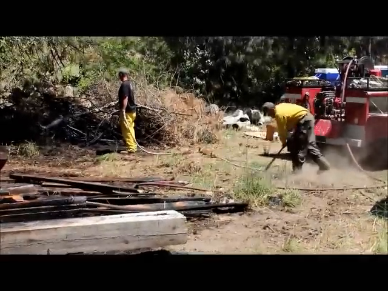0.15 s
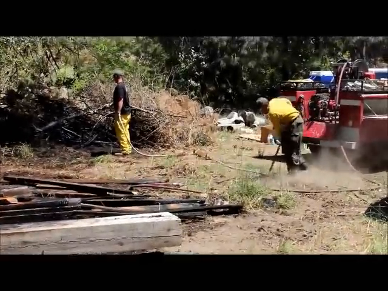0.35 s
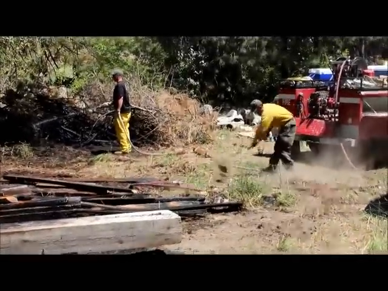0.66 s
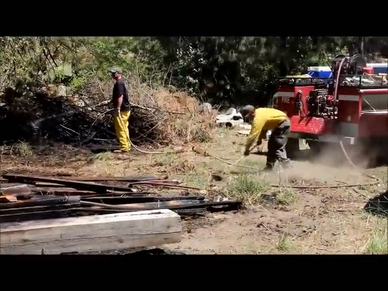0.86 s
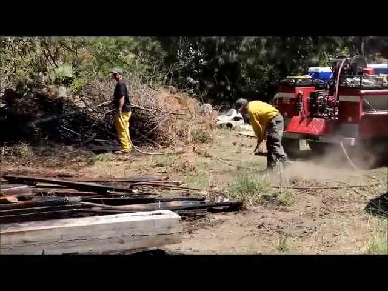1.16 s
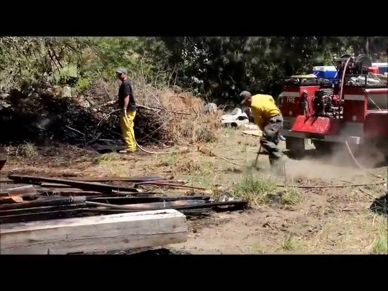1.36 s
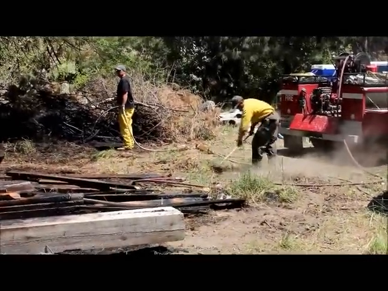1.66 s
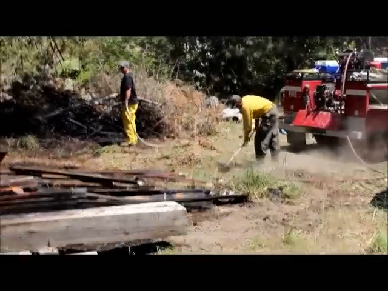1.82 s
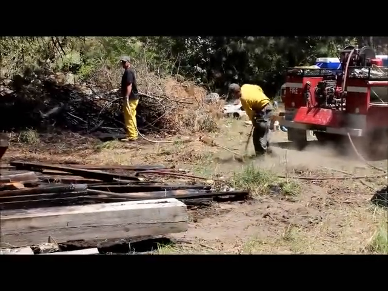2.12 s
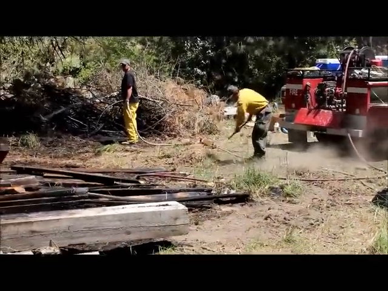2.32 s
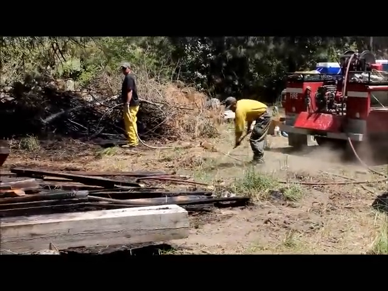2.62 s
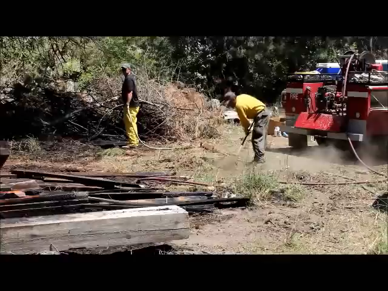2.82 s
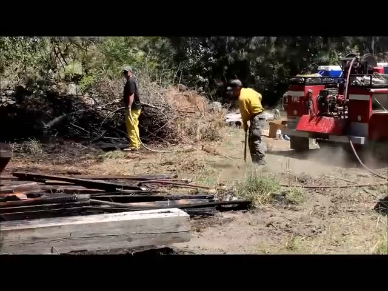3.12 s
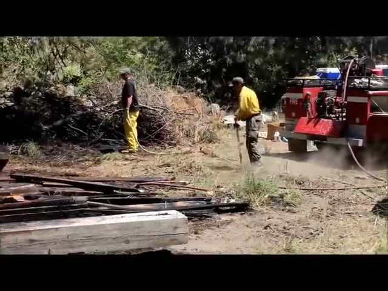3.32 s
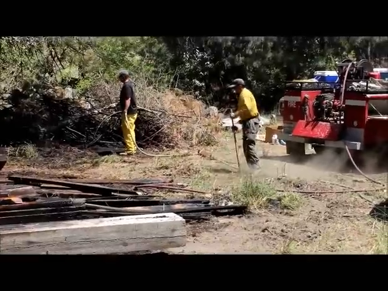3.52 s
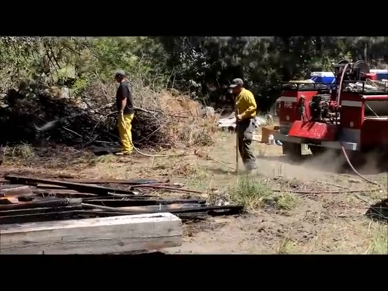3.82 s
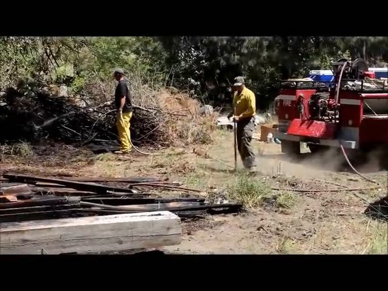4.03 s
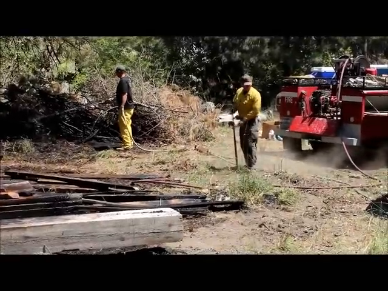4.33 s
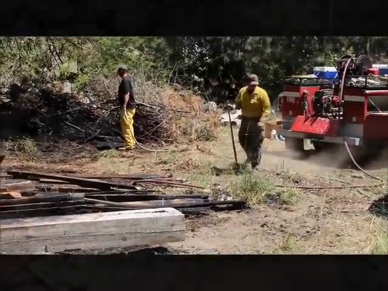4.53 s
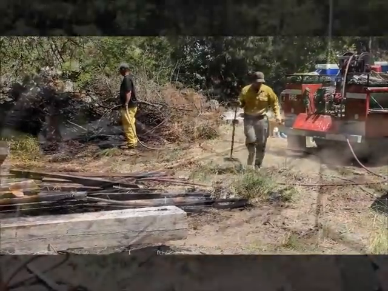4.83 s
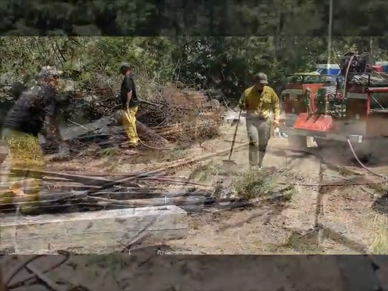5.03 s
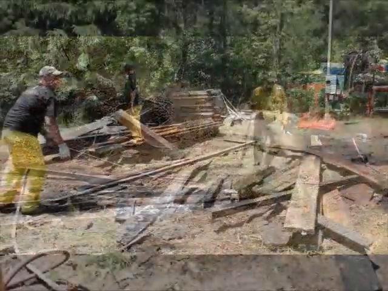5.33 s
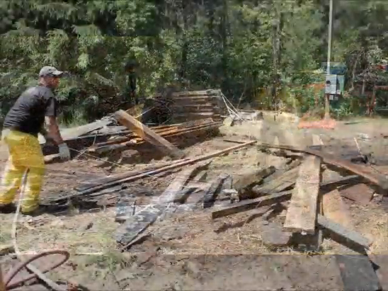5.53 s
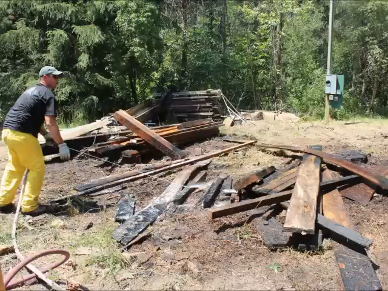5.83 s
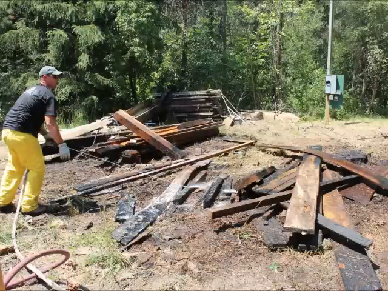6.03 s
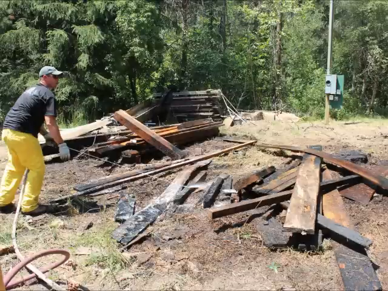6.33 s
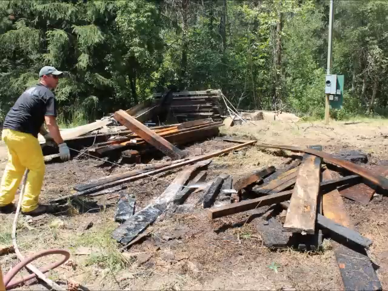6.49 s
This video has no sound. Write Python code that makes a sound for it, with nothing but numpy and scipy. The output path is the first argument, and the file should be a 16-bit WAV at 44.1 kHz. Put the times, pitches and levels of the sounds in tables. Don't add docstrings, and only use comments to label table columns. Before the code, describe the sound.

A steady, harsh, fast-puttering fire truck pump motor roars over a low idle, metal tool clinking twice on stones, until the sound cuts dead.

```python
import sys
import numpy as np
from scipy import signal
from scipy.io import wavfile
from scipy.ndimage import uniform_filter1d

SR = 44100
rng = np.random.default_rng(int(sys.argv[2]) if len(sys.argv) > 2 else 0)


def amplitude_ratio(level_db):
    exponent = np.asarray(level_db, float) / 20
    return 10 ** exponent


def dump(signal):
    limited = np.clip(np.atleast_2d(signal).T, -1, 1)
    pcm = np.round(limited * 32767).astype(np.int16)
    wavfile.write(sys.argv[1], SR, pcm)


N = 293706

# time in seconds, firings per second.
PUMP_SPEED = [(0, 27.402), (.75, 27.371), (1.5, 27.336), (2.25, 27.325), (3, 27.366), (3.75, 27.325),
              (4.5, 27.335), (5.25, 27.275), (6, 27.345)]
# time in seconds, firings per second.
MATE_SPEED = [(0, 28.879), (1, 29.002), (2, 28.973), (3, 28.987), (4, 28.866), (5, 28.751), (6, 28.847)]
# multiple of the firing rate, level in dB rms.
EXHAUST = [(1, -55), (2, -34), (3, -43), (4, -39), (5, -30), (6, -32), (7, -32), (8, -46), (9, -35),
           (10, -37), (11, -44), (12, -56), (13, -42), (14, -42), (15, -44), (16, -53), (17, -49),
           (18, -41), (19, -43), (20, -48)]
# multiple of the firing rate, level in dB rms.
SHROUD = [(21, -46), (22, -44), (24, -33), (25, -43), (26, -36), (27, -37), (28, -34), (29, -35), (30, -30),
          (31, -35), (32, -28), (33, -39), (36, -46), (40, -48), (42, -38), (44, -41), (46, -48), (48, -44),
          (49, -47), (50, -43), (56, -41), (60, -43), (61, -43), (62, -45), (70, -45), (73, -48), (78, -42),
          (84, -47)]
# multiple of the firing rate, level in dB rms.
MATE_EXHAUST = [(1, -50), (2, -49), (3, -37), (4, -37), (5, -42), (7, -33), (8, -42), (10, -38), (11, -47),
                (19, -45), (22, -46)]
# multiple of its cycle rate, level in dB rms.
IDLE = [(6, -56), (12, -37.5), (13, -49), (26, -51.5), (35, -42), (36, -44.5)]
# frequency in Hz, level in dB rms.
BELTS = [(66.9, -45.5), (70.2, -57), (102.9, -48), (123.0, -42), (133.6, -47.5), (157.6, -53.5),
         (168.1, -46.5), (212.3, -47.5), (224.9, -46)]

# frequency in Hz, level in dB per Hz.
ROAR = [(18, -25.5), (35, -30), (60, -22.5), (110, -9.5), (200, -3.5), (310, -4.5), (420, -7.5), (500, -15),
        (600, -4.5), (720, 0.5), (870, -1.5), (1000, -4.5), (1150, -18.5), (1400, -42.5)]
BODY = [(800, -40), (1000, -6), (1250, -3.5), (1650, -2.5), (2200, -3), (2700, -9), (3300, -41.5)]
CLATTER = [(1900, -28), (2500, -5), (3000, -1.5), (4000, -3), (4900, -6), (5500, -11.5), (7000, -38)]
HISS = [(4000, -38), (5000, -3), (5800, -2), (7000, -5), (9000, -7), (10500, -8.5), (11500, -13),
        (14000, -42.5)]
LEAK = [(7500, -29.5), (10000, -13), (11800, -1.5), (13000, 2.5), (14600, -0.5), (15650, -1.5),
        (16500, -38)]
# frequency in Hz, width in Hz, lift in dB.
PANELS = [(1620, 280, 1.5), (2195, 120, 0), (2915, 85, 6.5), (3100, 180, -2), (3480, 180, 5),
          (3950, 130, 6), (4340, 180, -0.5), (4576, 120, 8.5), (4640, 130, -3), (4820, 120, 0.5),
          (5860, 200, 4), (6100, 140, 0.5), (6300, 220, -1), (6800, 300, 1)]

# start as share of the cycle, length in cycles, level in dB,
# growth over the stroke in dB.
BLOWDOWN = [(.42, .26, 0, 1.8)]
VALVES = [(.04, 0.3, -5.5, 6), (.4, 0.33, 0.5, 0.5)]
JETS = [(.03, 0.29, 0.92, -1), (.41, .26, -1, 0)]
LEAKS = [(.03, 0.3, 2.5, -13), (.41, 0.39, -2, -2.5)]

# share of the cycle, level in dB.
KNOCKS = [(.46, -23), (.61, -20), (.965, -21.5)]
# frequency in Hz, level in dB, 60 dB decay in seconds.
KNOCK_RING = [(1690, 0, .006), (3880, -4, 0.0048)]
# time in seconds, peak in dB, 60 dB decay in seconds.
SPADE = [
    (1.063, -14.5, 0.035),
    (2.7914, -20.5, 0.025),
]
# frequency in Hz, level in dB.
BLADE = [(2500, 3.5), (4000, -3.5), (5750, -0.5), (6600, -3.5), (6950, -3.5), (8200, -13.5), (10100, -17.5)]

# time in seconds, level in dB.
BREEZE = [(0, -32), (.7, -31.5), (1.15, -32.5), (1.75, -33), (2.4, -32.5), (3.35, -32.5), (3.6, -33),
          (4.3, -34), (4.75, -33.5), (5.05, -32.5), (5.45, -34.5), (5.95, -33)]
# time in seconds, depth in dB.
DUCKS = [(.6, 2), (.85, 4), (1.72, 4), (2.106, 3.5), (2.442, 4), (3.48, 5), (3.53, 2.5), (4.315, 2),
         (4.74, 4), (5.361, 3), (5.56, 2)]

IDLE_HZ, CUT_S = 7.137, 5.98195
CLATTER_FOLLOWS, HISS_FOLLOWS, LEAK_FOLLOWS, WHOLE_FOLLOWS = 1, 2.4, .4, 0.24
PRIME_DB, PRIME_S, PRIME_SPREAD_S = 2, 1, .25
KNOCK_SPREAD, KNOCK_SCATTER_DB = .02, 3.5
DUCK_ATTACK_S, DUCK_RECOVERY_S = 0.0085, .045


def unit(x):
    return x / np.sqrt(np.mean(x ** 2) + 1e-20)


def curve(rows):
    s, value = np.transpose(rows)
    return np.interp(np.arange(N) / SR, s, value)


def wobble(rate):
    knots = rng.standard_normal(int(N * rate / SR) + 4)
    return np.interp(np.arange(N) * rate / SR, np.arange(len(knots)), knots)


def breeze_db():
    db = curve(BREEZE)
    return db - db.mean()


def partials(cycle, orders, lag, unsteady_db, drift):
    out = np.zeros(N)
    for (k, db), turns in zip(orders, lag):
        wander = amplitude_ratio(unsteady_db * wobble(9))
        phase = k * cycle + turns + drift * (1 + k / 40) * wobble(7)
        out += amplitude_ratio(db) * unit(wander) * np.cos(2 * np.pi * phase)
    return np.sqrt(2) * out


def bursts(cycle, strokes, force, steady, scatter_db, rise, fall):
    gate = np.zeros(N)
    for (start, length, db, growth_db), shared in zip(strokes, force):
        turn, since = np.divmod(cycle - start + 1, 1)
        own = rng.standard_normal(len(shared))
        chance = np.clip(.8 * shared + .6 * own, -3, 1.6)
        closing = 1 + np.exp(np.minimum((since - length) / fall, 50))
        opening = (1 - np.exp(-since / rise)) / closing
        stroke_db = db + scatter_db * chance[turn.astype(int)] + growth_db * since / length
        gate += amplitude_ratio(stroke_db) * opening
    rattle = np.repeat(rng.standard_normal(N // 16 + 1), 16)[:N]
    return steady + gate * amplitude_ratio(1.6 * rattle)


def rush(spectrum, patchy_db, gate):
    hz, _, z = signal.stft(gate * rng.standard_normal(N), SR, nperseg=2048)
    patches = uniform_filter1d(rng.standard_normal(z.shape), size=14, axis=0)
    patches = uniform_filter1d(patches, size=2, axis=1)
    f, level = np.transpose(spectrum)
    colour_db = np.interp(np.log(hz + 1), np.log(f), level, left=-120, right=-120)
    for centre, width, lift in PANELS:
        colour_db += lift / (1 + (2 * (hz - centre) / width) ** 2)
    z = z * amplitude_ratio(colour_db[:, None] + patchy_db * unit(patches))
    return unit(signal.istft(z, SR, nperseg=2048)[1][:N])


def exhaust_puffs(cycle):
    k = np.transpose(EXHAUST)[0]
    lag = .37 - .5 * k + .45 * (k > 8)
    lag += .07 * np.maximum(k - 11, 0) ** 2
    return amplitude_ratio(0.1) * partials(cycle, EXHAUST, lag, unsteady_db=0.6, drift=0.012)


def shroud_and_gas(cycle):
    t = np.arange(N) / SR
    shroud_db = 0.23 - PRIME_DB / (1 + np.exp((t - PRIME_S) / PRIME_SPREAD_S))
    lift_db = breeze_db()
    ring = partials(cycle, SHROUD, rng.random(len(SHROUD)), unsteady_db=1.5, drift=.045)
    force = rng.standard_normal((2, 200))

    gate = bursts(cycle, BLOWDOWN, force[1:], steady=16.0, scatter_db=0.0, rise=.04, fall=0.018)
    roar = rush(ROAR, 1.83, gate)
    gate = bursts(cycle, BLOWDOWN, force[1:], steady=4.0, scatter_db=1.5, rise=0.072, fall=0.011)
    body = rush(BODY, 0.4, gate)
    steady = 1.33 * amplitude_ratio(-.4 * lift_db)
    gate = bursts(cycle, VALVES, force, steady, scatter_db=2.5, rise=0.045, fall=0.018)
    clatter = rush(CLATTER, 0.67, gate)
    steady = 1.33 * amplitude_ratio(-1.3 * lift_db)
    gate = bursts(cycle, JETS, force, steady, scatter_db=2.0, rise=.008, fall=0.041)
    hiss = rush(HISS, 1.3, gate)
    gate = bursts(cycle, LEAKS, force, steady=1.6, scatter_db=2.0, rise=.015, fall=.04)
    leak = rush(LEAK, 0.6, gate)

    out = amplitude_ratio(shroud_db) * (amplitude_ratio(0.55) * ring + amplitude_ratio(-21.5) * roar)
    out += amplitude_ratio(-23.5) * body
    out += amplitude_ratio(-26.0 + CLATTER_FOLLOWS * lift_db) * clatter
    out += amplitude_ratio(-33.5 + HISS_FOLLOWS * lift_db) * hiss
    out += amplitude_ratio(-44.5 + LEAK_FOLLOWS * lift_db) * leak
    return out


def knocks(cycle):
    share, knock_db = np.transpose(KNOCKS)
    late, hard, side = rng.random((3, 200, len(KNOCKS)))
    due = np.arange(len(late))[:, None] + share + KNOCK_SPREAD * (2 * late - 1)
    at = np.searchsorted(cycle, due)
    size = amplitude_ratio(knock_db - KNOCK_SCATTER_DB * np.log(.03 + hard)) * np.sign(side - .5)
    t = np.arange(SR // 100) / SR
    ring = sum(amplitude_ratio(db - 60 * t / t60) * np.sin(2 * np.pi * hz * t) for hz, db, t60 in KNOCK_RING)
    hits = np.bincount(at.ravel(), size.ravel(), N + 1)
    return signal.fftconvolve(hits, ring)[:N]


def pump_engine():
    cycle = np.cumsum(curve(PUMP_SPEED)) / SR
    return exhaust_puffs(cycle) + shroud_and_gas(cycle) + knocks(cycle)


def mate_engine():
    cycle = np.cumsum(curve(MATE_SPEED)) / SR
    lag = .24 * np.transpose(MATE_EXHAUST)[0] - .25
    return partials(cycle, MATE_EXHAUST, lag, unsteady_db=2.0, drift=0.024)


def truck_idle():
    t = np.arange(N) / SR
    cycle = IDLE_HZ * t + .447
    engine = partials(cycle, IDLE, np.full(len(IDLE), .46), unsteady_db=.9, drift=.02)
    belts = partials(t, BELTS, rng.random(len(BELTS)), unsteady_db=-3.0, drift=0.008)
    return engine + belts


def spade():
    out, t = np.zeros(N), np.arange(SR // 10) / SR
    for s, db, t60 in SPADE:
        ring = sum(amplitude_ratio(level + rng.normal(0, 2)) * np.sin(2 * np.pi * hz * t) for hz, level in BLADE)
        grit = rng.standard_normal(len(t))
        ring += .6 * np.convolve(grit, [.5, 1, 1.0, 0, -.7, -1, -0.18], 'same')
        envelope = amplitude_ratio(db - 5.5 - 60 * t / max(t60, .01)) * (1 - np.exp(-t / 0.0009))
        out[round(s * SR):][:len(t)] += envelope * ring
    return out


def scene():
    return (pump_engine() + mate_engine() + truck_idle() + spade())[None]


def top_cut(x):
    return signal.sosfilt(signal.butter(12, 15680, fs=SR, output="sos"), x)


def record(dry):
    t = np.arange(N) / SR
    gain_db = WHOLE_FOLLOWS * breeze_db() + 0.29
    for s, depth_db in DUCKS:
        since = np.maximum(t - s, 0)
        gain_db -= depth_db * (1 - np.exp(-since / DUCK_ATTACK_S)) * np.exp(-since / DUCK_RECOVERY_S)
    x = dry * amplitude_ratio(gain_db)
    x = x / (1 + np.abs(x / 1.1) ** 4) ** (1 / 4)
    x = x + .0009
    return top_cut(x * (t < CUT_S))


dry = scene()
out = record(dry)
dump(out)
```